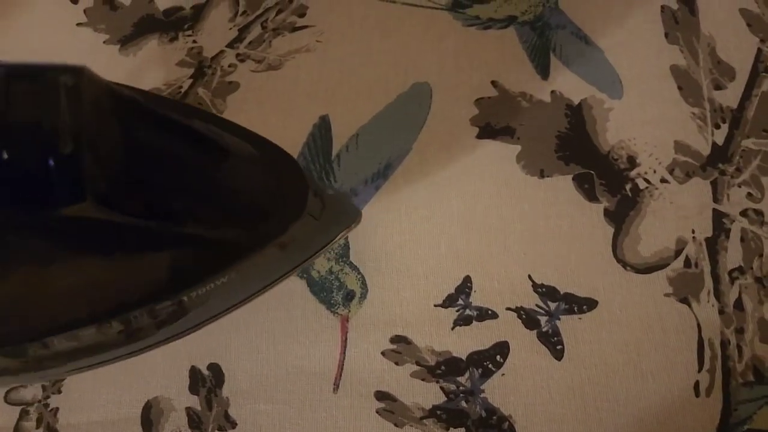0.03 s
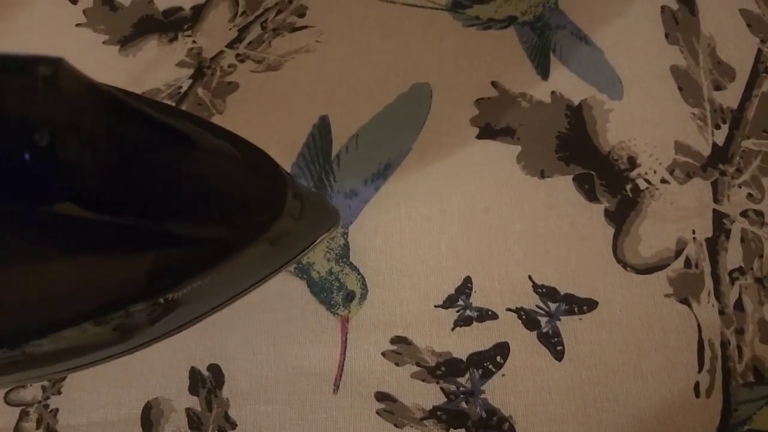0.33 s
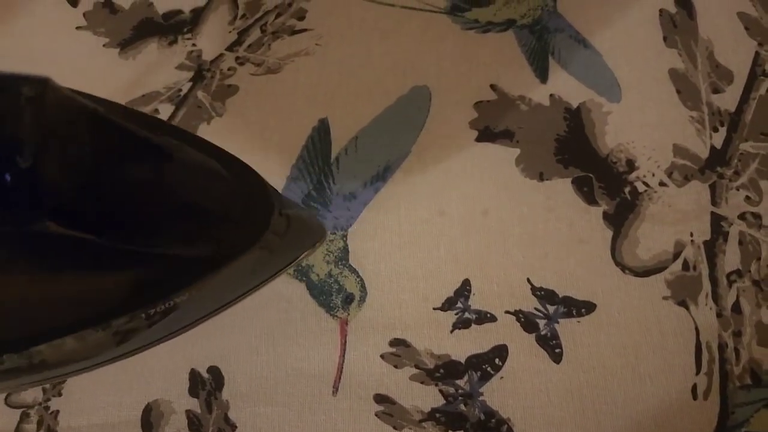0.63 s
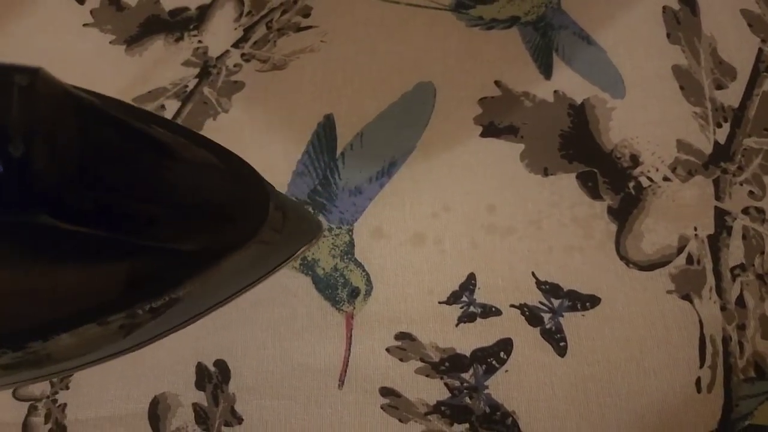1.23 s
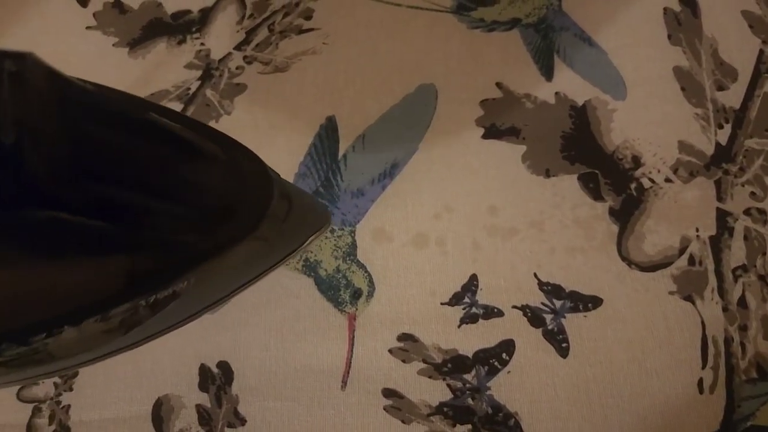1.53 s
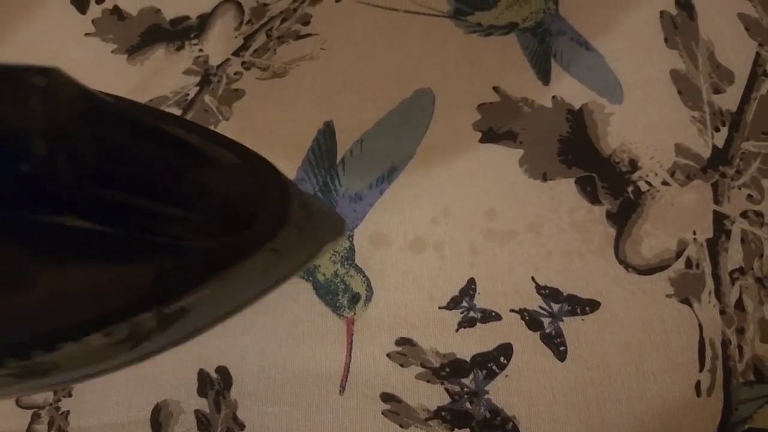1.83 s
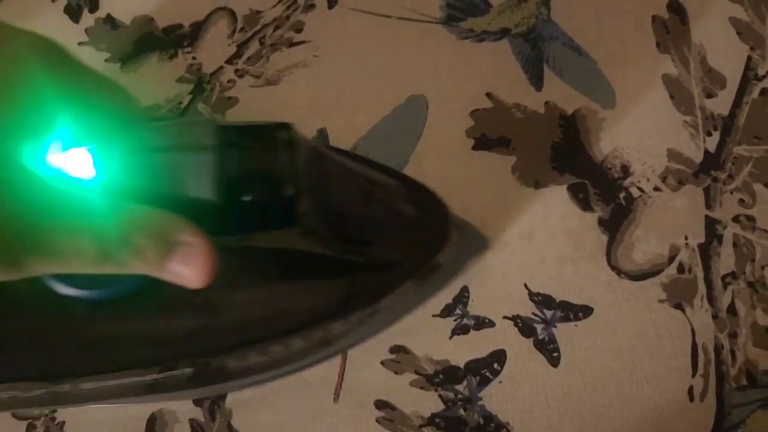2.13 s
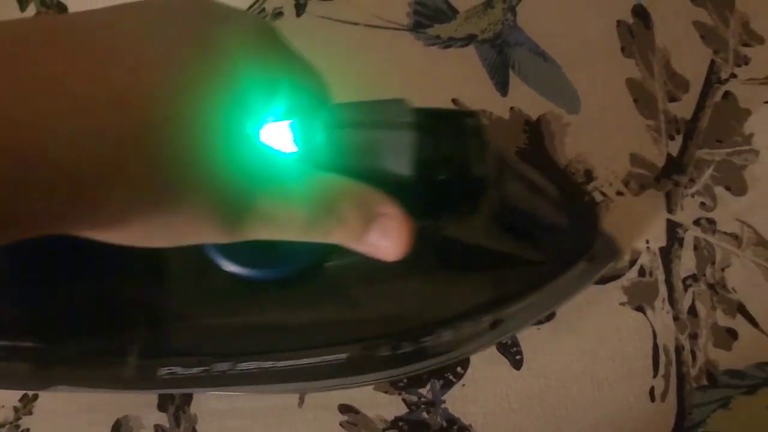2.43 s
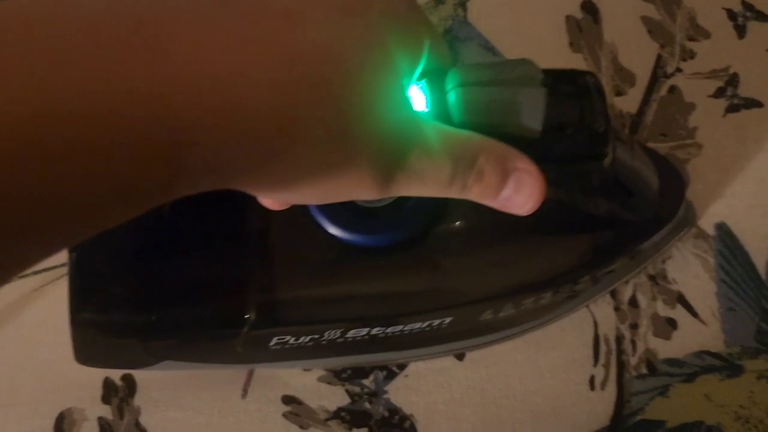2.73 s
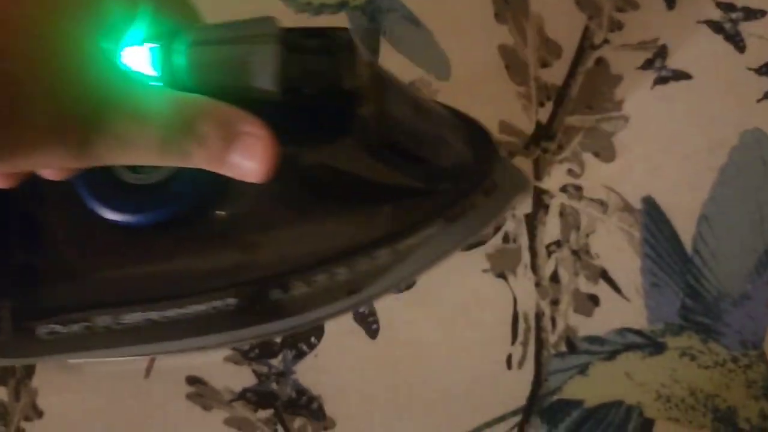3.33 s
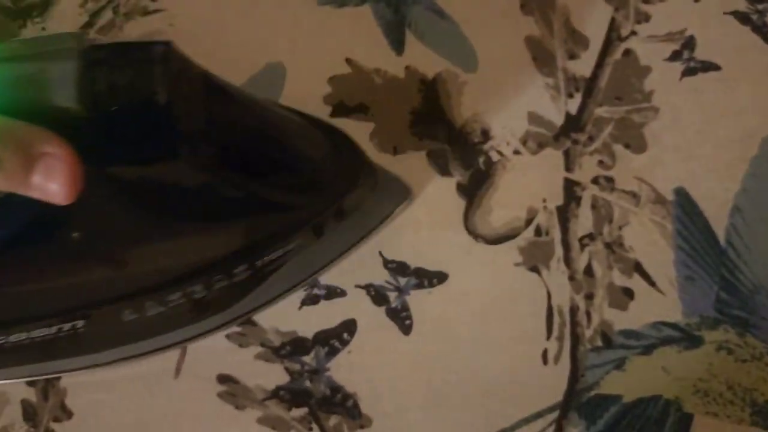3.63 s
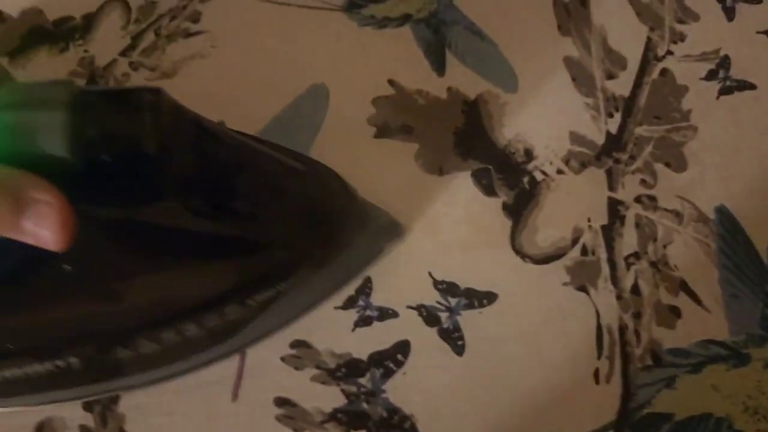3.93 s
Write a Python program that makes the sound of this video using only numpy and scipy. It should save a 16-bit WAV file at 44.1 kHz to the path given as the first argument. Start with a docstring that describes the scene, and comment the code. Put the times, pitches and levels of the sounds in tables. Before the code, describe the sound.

Steam iron sputtering and gurgling, followed by handle knocks and a soft slide across fabric.

```python
"""Steam spits and sputters over a low, fading hum: an iron rests on cloth, close by in a quiet room.
Water flashes to steam on the hot metal and hisses through the soleplate channels. Bubbles collapse
and thump in the tank, ringing the hollow shell. A hand knocks on the plastic handle, takes hold
and slides the iron forward and back, brushing the soleplate over the weave."""
import sys
import numpy as np
from scipy import signal
from scipy.fft import rfft, irfft
from scipy.io import wavfile
from scipy.ndimage import map_coordinates

SR = 44100
rng = np.random.default_rng(int(sys.argv[2]) if len(sys.argv) > 2 else 0)


def store_pcm(level_fs):
    """Save levels as 16-bit WAV."""
    pcm = np.round(np.clip(level_fs, -1, 1) * 32767).astype(np.int16)
    wavfile.write(sys.argv[1], SR, np.atleast_2d(pcm).T)


N = 176400
T = np.arange(N) / SR
HZ = np.fft.rfftfreq(4096, 1 / SR)


# steam jets: t/s, rise/s, fall/s, level/dB, spray re jet/dB
SPITS = [(0.1635, 0.0026, 0.023, -35.5, -3), (.197, .003, 0.013, -44, 7),
         (0.2048, 0.0036, 0.0049, -29.5, -7), (0.2132, 0.006, 0.0092, -27.5, 0.5),
         (.222, 0.0033, 0.14, -47, -2.5), (0.525, 0.019, 0.04, -42.5, -7), (.615, 0.0064, 0.016, -43, -22),
         (.878, 0.0049, 0.015, -47, -9), (0.972, 0.028, 0.14, -37.5, 0), (1.04, 0.046, 0.062, -37.5, 2),
         (1.13, 0.028, 0.055, -51.5, -22)]
# drops flashing to steam, the last a small tick on the cloth: t/s, level/dB, spray re drop/dB
SPUTTERS = [(0.0917, -36.5, -23), (0.532, -37, -22), (0.539, -28.5, -25), (.55, -36, -20),
            (0.565, -33, -25), (0.585, -33, -16), (0.642, -37.5, -22), (0.851, -43, -11), (.981, -42, 3),
            (1.03, -35, 1), (1.058, -40, 10), (1.086, -47, 7), (1.159, -46, 7), (1.168, -49, 7),
            (1.189, -50, 8), (1.2108, -47.5, 10.5), (1.5188, -32, -16), (1.5338, -32, -11),
            (1.549, -33, -10), (1.564, -31, -14), (1.5765, -26, -7), (1.5875, -34, -19), (1.6058, -32, -16),
            (1.6317, -35.5, -16), (3.2807, -48, 9)]
# spectra: f/Hz, level/dB
SPIT_SPECTRUM = [(300, -46), (1000, -4), (2200, 0.5), (3500, -0.5), (5500, 6.5), (7500, 9), (9700, -3.5),
                 (12000, -8), (15500, -7)]
SPRAY_SPECTRUM = [(2000, -19), (8000, -15), (10500, -10), (11700, -4.5), (13300, 2.5), (14000, -2),
                  (15000, 3), (16000, 1)]
SPUTTER_SPECTRUM = [(300, -18), (1000, 5), (2000, 13), (4000, 11.5), (7400, 13), (9800, -1.5), (11000, 7.5),
                    (14000, -45), (15700, 10)]
# steam hole resonances: f/Hz, width/Hz, lift/dB
HOLE_PEAKS = [(1800, 210, 5), (4570, 600, 2.5), (5500, 690, 5.5), (11800, 190, 6), (12730, 300, 5.5),
              (14700, 250, 2), (15350, 270, 1)]

def spitting():
    """Water meets hot metal: ragged spits and short sputters, both with a fine spray."""
    spit, sputter, spray = np.zeros((3, N))
    for start_s, rise_s, fall_s, db, spray_db in SPITS:
        jet = amp(db) * puff(start_s, rise_s, fall_s)
        spit += jet
        spray += jet * amp(spray_db)
    for start_s, db, spray_db in SPUTTERS:
        jet = amp(db) * puff(start_s, rise_s=0.0022, fall_s=0.0042)
        sputter += jet
        spray += jet * amp(spray_db)
    ragged = flutter(rate_hz=170, depth_db=3.5)
    holes_db = peaks(HOLE_PEAKS)
    return (colour(noise() * spit * ragged, curve(SPIT_SPECTRUM) + holes_db)
            + colour(noise() * spray * ragged, curve(SPRAY_SPECTRUM) + holes_db)
            + colour(noise() * sputter, curve(SPUTTER_SPECTRUM)))


# boil strength: t/s, bubbling level/dB, steam level/dB
BOIL = [(0, -52, -50.5), (.24, -48.5, -49.5), (.38, -41, -51), (.62, -41, -45.5), (.78, -44, -50),
        (.89, -37.5, -43), (.97, -42, -47), (1.02, -49.5, -50), (1.36, -50, -54.5), (1.46, -47, -51),
        (1.62, -46, -49.5), (1.8, -52, -53.5), (2.1, -55, -52.5), (2.22, -52, -51), (2.5, -57, -53.5),
        (2.7, -67.5, -54), (3.25, -63.5, -56.5), (3.45, -63.5, -54.5), (4, -60, -55)]
# big bubbles: t/s, peak level/dB
THUMPS = [(.378, -27.5), (0.45, -30.5), (.566, -26.5), (0.606, -34), (.669, -26.5), (.714, -27.5),
          (0.8209, -22), (0.8748, -22), (.89, -25), (.942, -27), (1.131, -36), (1.608, -33)]
# water tank: f/Hz, level/dB
TANK_SPECTRUM = [(60, -26), (140, 0), (210, -1.5), (255, -7), (325, -5), (400, -5.5), (470, -10.5),
                 (540, -19.5), (760, -30.5), (1300, -35), (4000, -56)]
# tank resonances: f/Hz, width/Hz, lift/dB
TANK_PEAKS = [(223, 20, 7.3), (279.4, 19.5, 11.2), (330, 43, 11), (378, 40, 3.9), (459.4, 29, 9.3),
              (627, 86, 12.5), (806, 48, 16.5), (995, 72, 22.9)]
# iron's stereo image: f/Hz, L-R correlation
IRON_STEREO = [(100, 1), (330, 0.87), (520, 0.34), (850, 0.13), (1250, -0.64), (1800, -0.38),
               (2500, -0.052), (6000, -0.16), (15000, 0.16)]

def boiling(bubbles_per_s=500, spread_db=6.5):
    """Small bubbles collapse densely and ring the tank; a few big ones thump."""
    sizes = amp(spread_db * np.minimum(rng.exponential(1, (2, N)), 3))
    signs = rng.choice([-1, 1], (2, N))
    collapses = rng.random((2, N)) < bubbles_per_s / SR
    pops = unit_rms(correlate(sizes * signs * collapses, IRON_STEREO))
    thumps = sum(thud(start_s, db, hz=281) for start_s, db in THUMPS)
    return colour(pops * level(BOIL), curve(TANK_SPECTRUM) + peaks(TANK_PEAKS)) + thumps


# hand on the handle: t/s, thud/dB, click/dB, click and snap fall/s, snap/dB, rattle/dB
KNOCKS = [(0.884, -31, -34, 0.012, -37.5, -38.5), (1.274, -37, -45, 0.014, -46, -63),
          (1.4493, -31.5, -37.5, 0.0077, -49, -47), (1.672, -38, -39.5, 0.015, -48, -51),
          (1.681, -40, -35, 0.0067, -36, -40), (1.86, -41, -44, 0.011, -42, -50),
          (1.893, -23.5, -31, .0045, -28.5, -41.5), (2.015, -34, -41.5, .008, -55, -54),
          (2.0211, -24, -35, 0.0045, -58, -41.5), (2.168, -31, -36, 0.01, -36, -38.5),
          (2.197, -34.5, -45.5, 0.011, -48, -43), (2.417, -40, -44.5, 0.021, -65, -63)]
# spectra: f/Hz, level/dB
CLICK_SPECTRUM = [(200, 7.5), (600, -4), (1100, -4.5), (2400, 0), (3400, -5.5), (4800, -4), (6300, -6.5),
                  (8000, -4.5), (9300, -28), (12000, -14.5), (15500, -32)]
SNAP_SPECTRUM = [(2500, -34), (3500, -6), (4050, -0.5), (4700, -11.5), (7000, -34)]
RATTLE_SPECTRUM = [(200, 2.5), (400, 10.5), (700, -3), (1250, -9), (1750, 3.5), (2500, 7.5), (3400, -10.5),
                   (4200, -4), (7000, -19), (15000, -22)]
# housing resonances: f/Hz, width/Hz, lift/dB
HOUSING_PEAKS = [(1590, 380, 9.8), (2760, 69, 2.8), (4030, 340, 17), (5530, 200, 5), (6200, 280, 14.5),
                 (7720, 650, 8)]

def knocks():
    """Each knock: a thud on the padded board, a housing click, a plastic snap, a short rattle."""
    thuds, clicks, snaps, rattles = np.zeros((4, N))
    for start_s, thud_db, click_db, fall_s, snap_db, rattle_db in KNOCKS:
        strike = puff(start_s, rise_s=0.00047, fall_s=fall_s)
        thuds += thud(start_s, thud_db, hz=298)
        clicks += amp(click_db) * strike
        snaps += amp(snap_db) * strike
        rattles += amp(rattle_db) * puff(start_s, rise_s=0.011, fall_s=0.017)
    return (thuds
            + colour(noise() * clicks, curve(CLICK_SPECTRUM) + peaks(HOUSING_PEAKS))
            + colour(noise() * snaps, curve(SNAP_SPECTRUM))
            + colour(noise() * rattles, curve(RATTLE_SPECTRUM)))


# soleplate friction: t/s, level/dB
SLIDE = [(2.73, -59.5), (2.75, -45), (2.796, -40.5), (2.82, -45), (3.12, -44.5), (3.214, -52.5),
         (3.29, -48.5), (3.42, -62), (3.544, -61), (3.58, -50), (3.634, -42), (3.694, -46), (3.76, -38),
         (3.84, -48), (3.93, -55), (4, -62)]
# rubbed cloth, and its change on the back stroke: f/Hz, level/dB
CLOTH_SPECTRUM = [(200, -23), (700, -16.5), (1200, -9), (1700, -10), (2300, -12), (3600, -5), (4500, -1.5),
                  (5600, -1), (6600, 0), (7500, -1), (8600, -5.5), (9800, -9), (11400, -4.5), (14000, -8.5),
                  (15500, -6.5)]
BACK_STROKE_EQ = [(700, 5), (2000, -0.5), (3500, 3), (5000, 3.5), (8000, 0), (12000, -1), (15500, -0.5)]
# soleplate resonances: f/Hz, width/Hz, lift/dB
PLATE_PEAKS = [(1670, 150, 7.5), (4400, 270, 1.8), (5500, 250, 3.5), (7380, 240, 4.3)]
# cloth's stereo image: f/Hz, L-R correlation
CLOTH_STEREO = [(300, 0.72), (700, 0.36), (1800, 0.57), (2300, 0.5), (5000, -0.2), (12000, 0.048)]

def sliding(turn_s=3.48):
    """The soleplate brushes over the weave and rings faintly, brighter in the upper mids on the way back."""
    rub = noise(CLOTH_STEREO) * level(SLIDE) * flutter(rate_hz=120, depth_db=0.9)
    back = T > turn_s
    cloth_db = curve(CLOTH_SPECTRUM) + peaks(PLATE_PEAKS)
    return colour(rub * ~back, cloth_db) + colour(rub * back, cloth_db + curve(BACK_STROKE_EQ))


# steam channels: f/Hz, level/dB
VENT_SPECTRUM = [(100, -9.5), (600, 0), (1200, -1.5), (2300, 3), (3400, -1.5), (6000, -3.5), (8000, -7),
                 (9500, -29.5), (12000, -8.5), (15500, -22)]
# channel resonances: f/Hz, width/Hz, lift/dB
VENT_PEAKS = [(1553, 74, 9), (1737, 440, 9.5), (2224, 61, 9), (2420, 61, 4), (2595, 72, 10.5),
              (3486, 126, 8.5), (4146, 260, 14.5), (5460, 460, 7.5), (6255, 370, 11.5), (7050, 370, -10.5),
              (7720, 1000, 6)]

def steam_flow(boil_exponent=0.34):
    """Steam rings the soleplate channels at a wandering pitch, more ragged the harder the boil."""
    boil = level(BOIL)
    raggedness = (boil / boil.max()) ** boil_exponent
    surges = flutter(rate_hz=25, depth_db=3.0) ** raggedness
    hiss = colour(noise(), curve(VENT_SPECTRUM) + peaks(VENT_PEAKS))
    return drift(hiss, share=0.009, rate_hz=14) * level(BOIL, column=2) * surges


# jolts to the shell: t/s, level/dB
JOLTS = [(0.364, -44.5), (.478, -41), (.605, -39), (.622, -53), (0.732, -43.5), (0.878, -36), (1.57, -45),
         (1.859, -45.5), (2.015, -38.5), (2.167, -44)]
# shell ring: f/Hz, level/dB
SHELL_SPECTRUM = [(700, -25.5), (1300, -33), (1540, -7), (1640, -6.5), (1710, 4.5), (1800, -10),
                  (2000, -13.5), (2500, -16), (4000, -38)]
# rocking shell, partly in antiphase: f/Hz, L-R correlation
SHELL_STEREO = [(1200, -0.49), (1750, -0.59), (2300, -0.11)]

def shell_ring(coupling_db=-9.5):
    """Bubbling and jolts ring the iron's hollow shell."""
    bubbling = amp(coupling_db) * level(BOIL)
    jolts = sum(amp(db) * puff(start_s, rise_s=0.013, fall_s=0.057) for start_s, db in JOLTS)
    return colour(noise(SHELL_STEREO) * np.hypot(bubbling, jolts), curve(SHELL_SPECTRUM))


# low hum: t/s, level/dB
HUM = [(0, -36.5), (.12, -41.5), (.2, -46.5), (.5, -43), (.63, -45), (.79, -40.5), (.9, -43.5), (1.1, -55),
       (1.4, -65.5), (4, -74)]

def hum(hz=77.9, waver=0.0024):
    """A low, slightly wavering tone dies away."""
    pitch_hz = hz * (1 + waver * wander(rate_hz=6.8))
    tone = np.sqrt(2) * np.sin(2 * np.pi * np.cumsum(pitch_hz) / SR)
    return tone * level(HUM) * flutter(rate_hz=30, depth_db=-0.5)


# higher drone: t/s, level/dB
DRONE = [(0, -75), (1.2, -55.5), (1.42, -53), (1.64, -63), (1.9, -48), (2.35, -49.5), (2.55, -51.5),
         (2.72, -47.5), (2.92, -52.5), (3.12, -51.5), (3.45, -57), (4, -58)]

def drone(hz=113, width_hz=32.7):
    """A fuzzy, narrow noise band sounds while the iron is handled."""
    return np.sqrt(2) * np.sin(2 * np.pi * hz * T) * wander(width_hz / 2) * level(DRONE)


# room rumble: f/Hz, level/dB
ROOM_SPECTRUM = [(20, -27), (35, -6), (55, -4.5), (76, 1), (100, -12), (125, -8), (200, -18), (400, -28.5),
                 (800, -42.5), (3000, -48), (9000, -49.5), (15500, -76)]
# room's stereo image: f/Hz, L-R correlation
ROOM_STEREO = [(25, 1), (80, 0.95), (200, 0.93), (500, 0.86), (1000, 0.58), (3000, 0)]

def room_rumble(db=-47.5):
    """Steady low noise of the room."""
    return amp(db) * colour(noise(ROOM_STEREO), curve(ROOM_SPECTRUM))


def reflections(x, t60_s, wet_db, gap_s=0.004):
    """The room returns a short, diffuse tail."""
    t = T[:SR // 2]
    tail = rng.standard_normal((2, len(t))) * amp(-60 * t / t60_s) * (t > gap_s)
    return amp(wet_db) * signal.oaconvolve(x, tail / np.linalg.norm(tail[0]), axes=1)[:, :N]


def thud(start_s, db, hz, swell_s=0.0018):
    """Heavily damped swing of the iron's body: one deep dip between two small crests."""
    t = T - start_s - swell_s
    envelope = np.exp(-np.minimum((t / swell_s) ** 2, 50))
    return -amp(db) * envelope * np.cos(2 * np.pi * hz * t)


def puff(start_s, rise_s, fall_s):
    """Envelope: linear rise, then 20 dB down per fall_s."""
    t = T - start_s
    return np.clip(t / rise_s, 0, 1) * amp(-20 * np.clip((t - rise_s) / fall_s, 0, 10))


def amp(db):
    """Decibels to gain."""
    return 10 ** (np.asarray(db) / 20)


def unit_rms(x):
    """Scales to rms 1."""
    return x / np.sqrt(np.mean(x ** 2) + 1e-20)


def level(points, column=1):
    """Gain over time from one dB column."""
    columns = np.transpose(points)
    return amp(np.interp(T, columns[0], columns[column]))


def curve(points, hz=HZ):
    """Interpolates over log frequency."""
    f, value = np.transpose(points)
    return np.interp(np.log(hz + 1), np.log(f + 1), value)


def peaks(table):
    """Summed resonance lift in dB over frequency."""
    return sum(db / (1 + (2 * (HZ - hz) / width_hz) ** 2) for hz, width_hz, db in table)


def colour(x, db):
    """Minimum-phase filter of unit energy; db sets the shape only."""
    log_gain = np.log(amp(np.r_[db, db[-2:0:-1]]))
    taps = np.fft.ifft(np.exp(np.conj(signal.hilbert(log_gain)))).real
    return signal.oaconvolve(x, taps[None] / np.linalg.norm(taps), axes=1)[:, :N]


def correlate(two, stereo):
    """Blends two independent signals to a given L-R correlation."""
    left, other = rfft(two)
    likeness = curve(stereo, np.fft.rfftfreq(N, 1 / SR))
    right = likeness * left + np.sqrt(1 - likeness ** 2) * other
    return irfft(np.array([left, right]), N)


def noise(stereo=IRON_STEREO):
    """Stereo white noise."""
    return correlate(rng.standard_normal((2, N)), stereo)


def wander(rate_hz):
    """Smooth random signal of rms 1."""
    lowpass = np.exp(-(np.fft.rfftfreq(N, 1 / SR) / rate_hz) ** 2)
    return unit_rms(irfft(rfft(rng.standard_normal(N)) * lowpass, N))


def flutter(rate_hz, depth_db):
    """Uneven gain around 1."""
    return unit_rms(amp(depth_db * np.clip(wander(rate_hz), -2, 2)))


def drift(x, share, rate_hz):
    """Resamples so that the pitch wanders by a small share."""
    position = np.cumsum(1 + share * wander(rate_hz))
    return np.array([map_coordinates(side, [position], order=5, mode="wrap") for side in x])


def scene():
    """The iron and its room; only spits, sputters and knocks get reflections."""
    sharp = spitting() + knocks()
    background = hum() + drone() + room_rumble()
    simmer = boiling() + shell_ring() + steam_flow()
    return sharp + simmer + sliding() + background + reflections(sharp, t60_s=0.095, wet_db=-6)


# microphone pair: f/Hz, L minus R level/dB
MIC_BALANCE = [(70, -1), (200, 1.5), (380, 3), (650, 2.5), (1000, 0), (1400, 2), (1700, 0), (2400, 0.5),
               (3300, 1.5), (4300, -6.5), (6000, -4), (8000, -2), (10800, 0), (12500, 6), (15000, 32)]

def record(dry, cutoff_hz=15600):
    """Two microphones of differing colour, then a low-pass."""
    balance_db = curve(MIC_BALANCE, np.fft.rfftfreq(N, 1 / SR))
    gains = amp(np.array([balance_db, -balance_db]) / 2)
    gains /= np.sqrt(np.mean(gains ** 2, axis=0))
    heard = irfft(rfft(dry) * gains, N)
    lowpass = signal.firwin(511, cutoff_hz, window=("kaiser", 9), fs=SR)
    return signal.oaconvolve(heard, lowpass[None], "same")


dry = scene()
out = record(dry)
store_pcm(out)
```